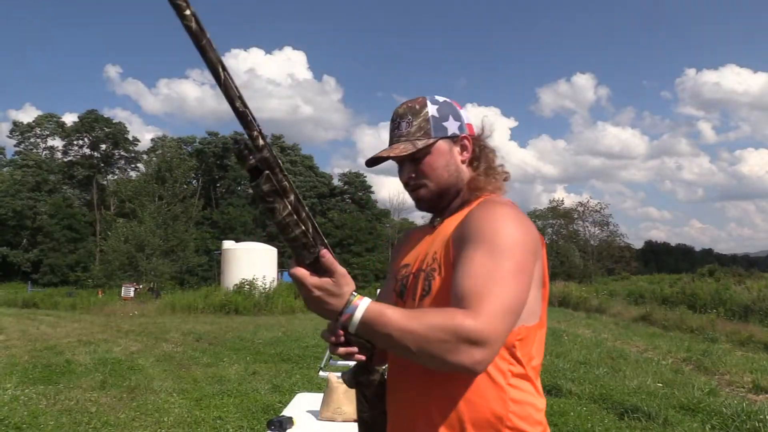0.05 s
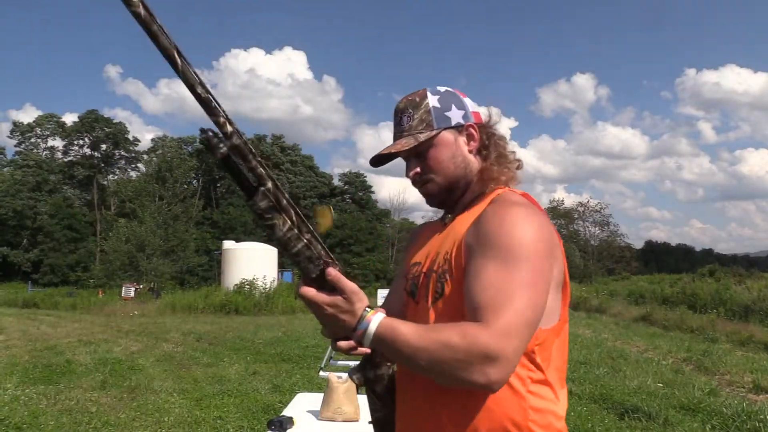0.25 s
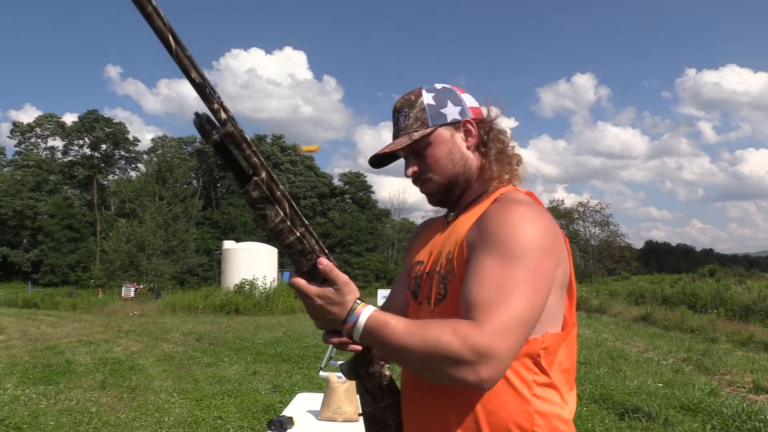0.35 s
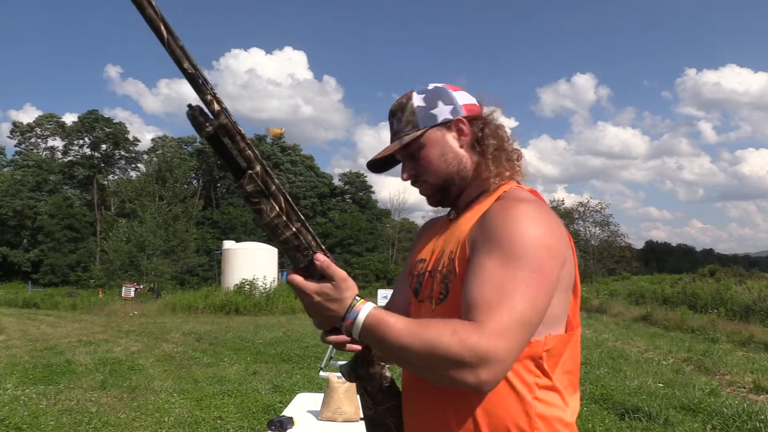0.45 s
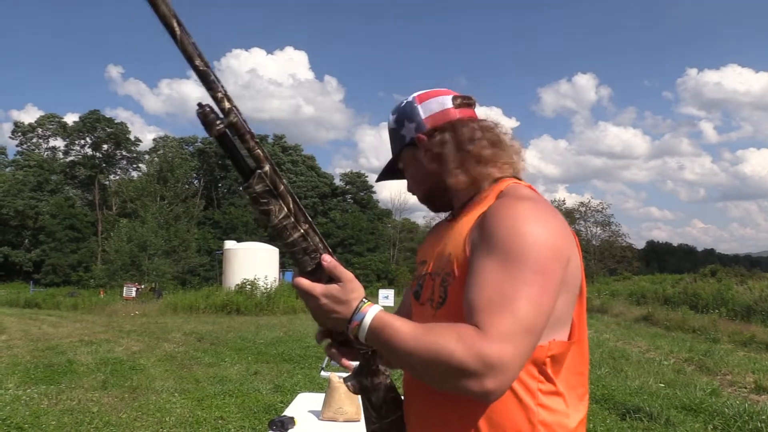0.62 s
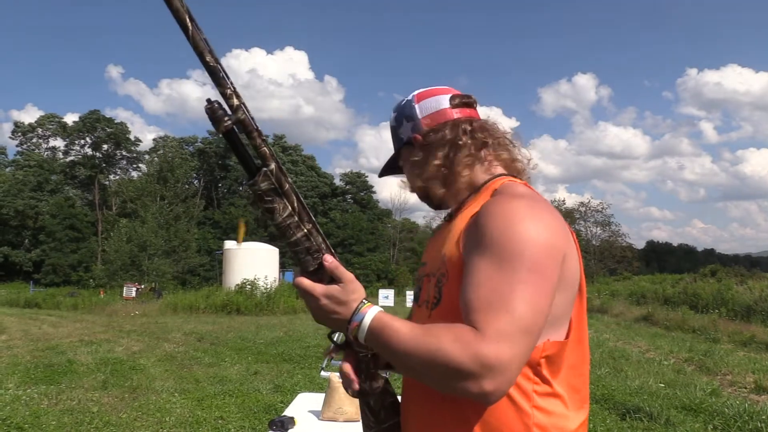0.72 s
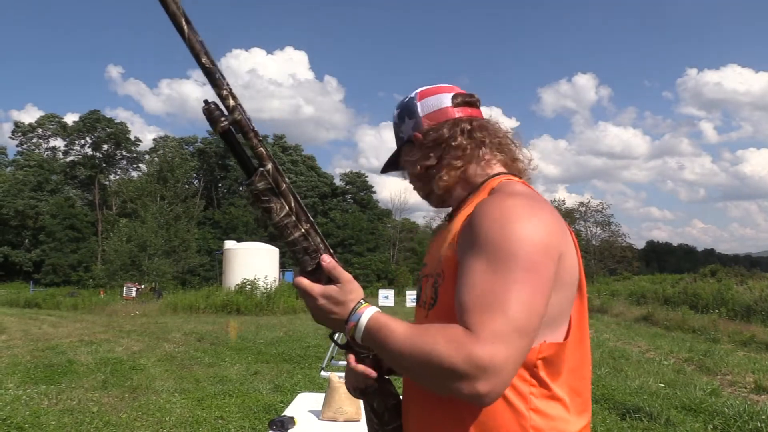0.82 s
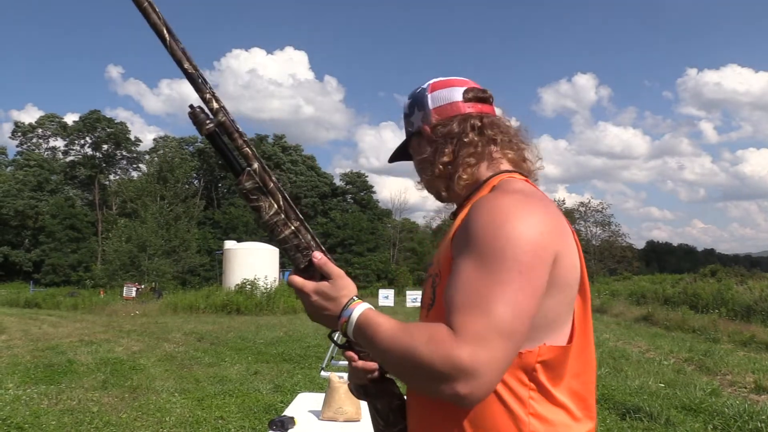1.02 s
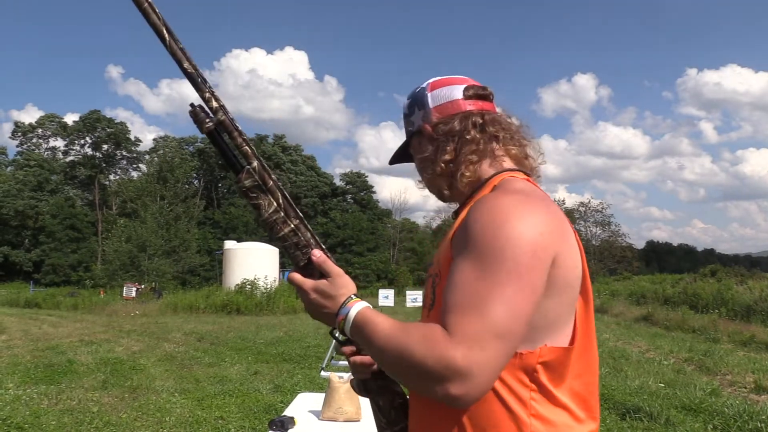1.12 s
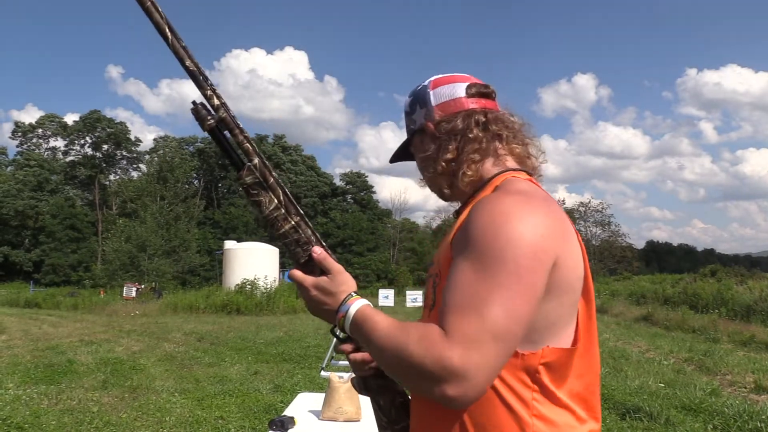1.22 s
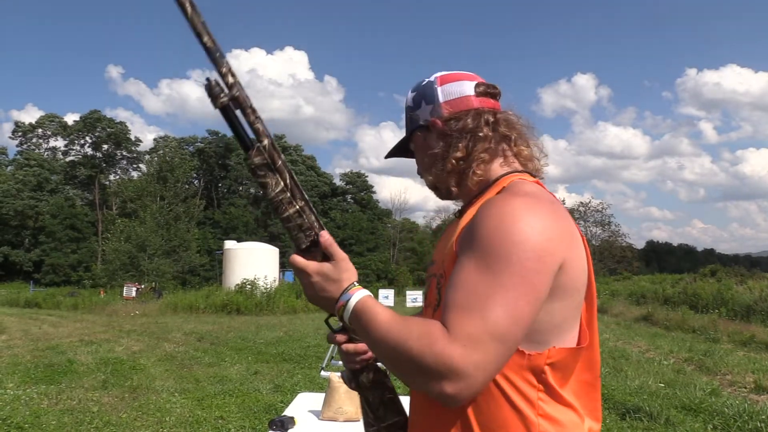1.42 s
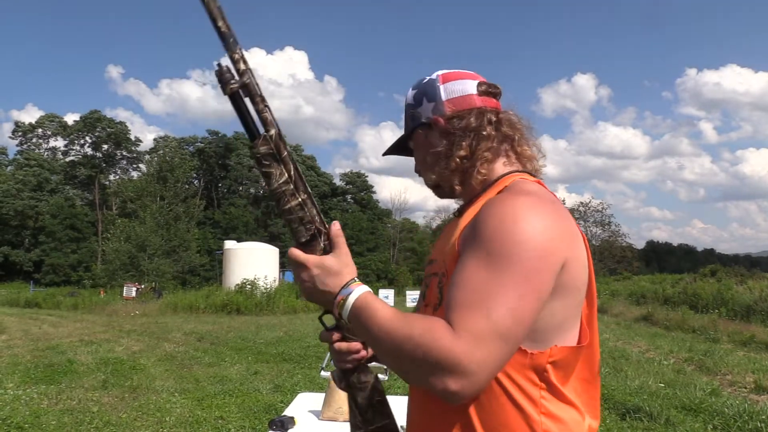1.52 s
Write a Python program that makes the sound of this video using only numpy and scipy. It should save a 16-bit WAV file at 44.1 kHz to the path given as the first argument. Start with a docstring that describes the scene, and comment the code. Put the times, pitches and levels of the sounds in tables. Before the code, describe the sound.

A pump shotgun is worked once with one sharp metallic clack, outdoors.

```python
"""A pump shotgun is worked once in an open field, about a metre from the microphone.
Over a quiet outdoor hiss, a palm rubs the fore-end and loose parts tick. At 0.2 s the action unlocks,
the fore-end scrapes along its bars and the bolt slams into its stop; receiver and barrel ring briefly
and the field returns a faint tail. More ticks follow, a small catch clicks at 1.15 s,
and clothes rustle to the end."""
import sys
import numpy as np
from scipy import signal
from scipy.fft import rfft, irfft
from scipy.io import wavfile
from scipy.ndimage import uniform_filter1d, minimum_filter1d

SR = 44100
rng = np.random.default_rng(int(sys.argv[2]) if len(sys.argv) > 2 else 0)


def transcribe(u):
    """Save the signal u as a 16-bit wav file named by the first command-line argument.

    u: samples, shape (n,) or (channels, n), limited to [-1, 1]; the rate is SR.
    q: integer samples, one column per channel.
    """
    v = np.clip(np.atleast_2d(u).T, -1, 1)
    q = np.round(v * 32767).astype(np.int16)
    wavfile.write(sys.argv[1], SR, q)


N = 68355

# blows in the action (time [s], clatter level [dB], clatter t60 [s], treble tilt [dB/octave],
# receiver ring level [dB], thud level [dB])
BLOWS = [(0.2044, -16.5, 0.014, -2.35, -37.5, -86), (0.2081, -21.5, 0.005, -4.5, -47.5, -84.5),
         (0.2217, -22.5, 0.02, 0.8, -47.5, -80.5), (0.2404, -24.5, .02, -1, -17, -60),
         (0.2453, -19.5, 0.0089, -2.5, -29.5, -39.5), (0.2477, -14, 0.021, 0.5, -3.5, -37.5),
         (0.2526, -21.5, 0.032, -2, -30, -46), (0.2588, -33, .018, -2.5, -32.5, -55.5)]
# colour of clattering and scraping steel (frequency [Hz], level [dB])
STEEL_COLOUR = [(100, -33), (300, -20), (600, -5.5), (1100, -9), (1700, 1), (1980, -8), (2500, 0.5),
                (3300, 3), (4300, -2), (4700, -5), (6500, -3.5), (9000, -11.5), (12000, -10), (16000, -18)]
CONTACT_S = 0.00059  # rise time of a knock


def amp(db):
    """Decibels to gain."""
    return 10 ** (np.asarray(db) / 20)


def colour(x, points, tilt_db=0):
    """Filter x by (Hz, dB) points, tilted per octave above 3 kHz; white noise keeps its power."""
    hz = np.maximum(np.arange(N // 2 + 1) * SR / N, 1)
    point_hz, db = np.array(points).T
    octaves = np.log2(np.maximum(hz / 3000, 1))
    gain = amp(np.interp(np.log(hz), np.log(point_hz), db) + tilt_db * octaves)
    return irfft(rfft(x) * gain / np.sqrt(np.mean(gain ** 2)), N)


def noise(points):
    """Coloured noise, rms 1."""
    return colour(rng.standard_normal(N), points)


def since(start):
    """Seconds after start, zero before it."""
    return np.maximum(np.arange(N) / SR - start, 0)


def envelope(start, attack, t60):
    """A quick rise and an exponential fall."""
    t = since(start)
    return np.minimum(t / attack, 1) * np.exp(-np.log(1000) * t / t60)


def burst(start, points, t60, tilt_db=0, attack=CONTACT_S):
    """Many crowded modes struck at once: a coloured crack that dies away."""
    crack = np.sign(rng.standard_normal(N)) * envelope(start, attack, t60)
    return colour(crack, points, tilt_db)


def ring(start, modes):
    """Decaying partials of a struck part."""
    return sum(amp(db) * np.sin(2 * np.pi * hz * since(start)) * envelope(start, attack=0.0011, t60=t60)
               for hz, db, t60 in modes)


def fade(points):
    """Gain along (s, dB) points."""
    times, db = np.array(points).T
    return amp(np.interp(since(0), times, db))


def field_hiss(level_db=-69.5, sway_db=1.1):
    """Quiet outdoor hiss that sways a little."""
    # open air around the microphone (frequency [Hz], level [dB])
    hiss_colour = [(25, -5.5), (90, -5), (200, 0.5), (320, -5.5), (650, -7), (1000, -9), (2200, -10.5),
                   (3200, -9.5), (4050, -7.5), (4800, -13.5), (7000, -20.5), (10000, -21.5), (16000, -22.5)]
    sway = np.interp(since(0), np.linspace(0, N / SR, num=12), rng.standard_normal(12))
    return amp(level_db + sway_db * sway) * noise(hiss_colour)


def ground_scatter(x):
    """Nearby ground scatters the sound briefly; the field returns a faint longer tail."""
    # scatter from the ground near the microphone (frequency [Hz], level [dB])
    near_colour = [(100, -23.5), (300, -7), (700, -1), (1350, -4), (2200, -4.5), (3800, -3), (4700, 0),
                   (7000, -5.5), (12000, 1), (16000, -4.5)]
    # scatter from farther out in the field (frequency [Hz], level [dB])
    far_colour = [(100, -18.5), (300, -3.5), (700, 7.5), (1100, -2), (1700, -5.5), (3200, -9), (4250, 5.5),
                  (4900, -4), (7000, -9.5), (16000, -19)]
    out = x
    for points, db, t60 in ((near_colour, -17.5, 0.13), (far_colour, -25.5, 0.44)):
        tail = noise(points) * envelope(start=0.001, attack=0.0025, t60=t60)
        tail /= np.sqrt(np.sum(tail ** 2))
        out = out + amp(db) * signal.fftconvolve(x, tail)[:N]
    return out


def rustle(rough_db=1.5):
    """Palm and cloth rub in uneven little slips."""
    # palm on the fore-end (frequency [Hz], level [dB])
    grip_colour = [(80, -18.5), (250, -5.5), (540, -1.5), (750, -6), (1200, -7), (1550, 1.5), (2100, -17.5),
                   (3400, -8), (5000, -26.5), (16000, -36.5)]
    # its rubbing before the stroke (time [s], level [dB])
    grip_levels = [(0, -61), (.05, -68.5), (.16, -65.5), (.2, -66.5), (.23, -85)]
    # hands and clothes (frequency [Hz], level [dB])
    cloth_colour = [(40, -6), (100, 9.5), (220, -5.5), (400, 3.5), (800, -4), (1300, 1), (2200, -6.5),
                    (4000, -6), (7000, -15), (16000, -26.5)]
    # their rustle, strongest near the end (time [s], level [dB])
    cloth_levels = [(.55, -86.5), (.7, -79.5), (.95, -82.5), (1.25, -86), (1.36, -72.5), (1.44, -66.5),
                    (1.52, -65.5), (1.55, -68.5)]
    grain = uniform_filter1d(rng.standard_normal(N), size=220)
    palm = fade(grip_levels) * noise(grip_colour)
    cloth = fade(cloth_levels) * noise(cloth_colour)
    return amp(rough_db * grain / grain.std()) * (palm + cloth)


def loose_parts():
    """Loose parts knock lightly before and after the stroke."""
    # light knocks (time [s], level [dB])
    ticks = [(.127, -90), (0.153, -65), (.187, -62), (0.198, -63), (0.3937, -54), (0.3994, -45.5),
             (.4675, -55.5), (0.482, -60), (.499, -60.5), (.551, -66.5)]
    # colour of one knock (frequency [Hz], level [dB])
    tick_colour = [(200, -24), (700, -14.5), (1100, -4.5), (2200, -5.5), (3700, 6), (4700, -5.5),
                   (7000, -17), (10000, -31.5), (16000, -34.5)]
    return sum(amp(db) * burst(start, tick_colour, t60=0.048) for start, db in ticks)


def catch():
    """A small catch gives way and snaps home, bright with one low ring."""
    # release and snap (time [s], level [dB], t60 [s], treble tilt [dB/octave])
    clicks = [(1.1534, -56.5, 0.017, 3), (1.1567, -48, 0.032, -1.5)]
    # colour of a click (frequency [Hz], level [dB])
    click_colour = [(60, -23.5), (200, 4.5), (700, -3), (3000, -3), (6300, -5.5), (8000, 4.5), (9500, -2.5),
                    (11500, -2), (16000, -14)]
    # ring of the catch (frequency [Hz], level [dB], t60 [s])
    modes = [(1155, -52, 0.046)]
    clicking = sum(amp(db) * burst(start, click_colour, t60, tilt_db, attack=0.0016)
                   for start, db, t60, tilt_db in clicks)
    snap_s = clicks[-1][0]
    return clicking + ring(snap_s, modes)


def slide(start_s=0.204, end_s=0.260, slips_per_s=9800, level_db=-38.5):
    """The action bars scrape: dense stick-slip clicks while the fore-end travels."""
    t = since(0)
    slips = (rng.random(N) < slips_per_s / SR) * rng.standard_normal(N)
    moving = uniform_filter1d(1. * ((t > start_s) & (t < end_s)), size=200)
    return amp(level_db) * colour(moving * slips / slips.std(), STEEL_COLOUR, tilt_db=-4)


def action_blows():
    """Each blow clatters and thumps the stock; the hardest also sets the barrel ringing."""
    # long modes of barrel and magazine tube (frequency [Hz], level [dB], t60 [s])
    barrel_modes = [(253, -52, .24), (538, -71, .35), (738, -65, .15), (1338, -49, .19), (4037, -65, .3),
                    (4215, -61, .38)]
    # thud of the stock (frequency [Hz], level [dB])
    stock_colour = [(30, -12), (90, -9.5), (220, -1), (430, -3.5), (650, 4.5), (850, -7.5), (1100, 4),
                    (1350, -12.5), (3000, -35.5)]
    hardest_s = max(BLOWS, key=lambda blow: blow[4])[0]
    out = ring(hardest_s, barrel_modes)
    for start, clatter_db, t60, tilt_db, _, thud_db in BLOWS:
        out += amp(clatter_db) * burst(start, STEEL_COLOUR, t60, tilt_db)
        out += amp(thud_db) * burst(start, stock_colour, t60=0.028)
    return out


def receiver():
    """The hand-damped receiver gives a short, hard ring at each blow."""
    # short modes of the receiver (frequency [Hz], level [dB], t60 [s])
    modes = [(1100, -23, .025), (1400, -21, .037), (1660, -11, .017), (1780, -29, .03), (2260, -26, .045),
             (2635, -24, .03), (2880, -20, .03), (3390, -23, .028), (3680, -9, .018), (4020, 0, .015),
             (4210, -12, .022)]
    return sum(amp(ring_db) * ring(start, modes) for start, _, _, _, ring_db, _ in BLOWS)


def scene():
    """The gun a metre from one microphone in the field; receiver ring and rustle arrive dry."""
    mechanism = action_blows() + slide() + loose_parts() + catch()
    return (ground_scatter(mechanism) + receiver() + rustle() + field_hiss())[None]


def record(dry, limit_db=-5.5, hold_s=0.0018, top_hz=16300):
    """A fast limiter holds down the loudest clack; the recorder cuts the top."""
    span = int(hold_s * SR)
    gain = np.minimum(1, amp(limit_db) / (np.abs(dry) + 1e-9))
    limited = dry * uniform_filter1d(minimum_filter1d(gain, span), span)
    lowpass = signal.ellip(10, rp=0.2, rs=70, Wn=top_hz, fs=SR, output="sos")
    return signal.sosfilt(lowpass, limited)


dry = scene()
out = record(dry)
transcribe(out)
```